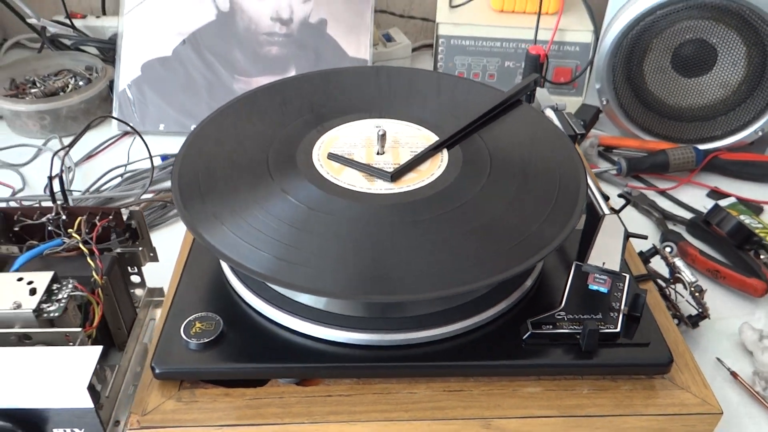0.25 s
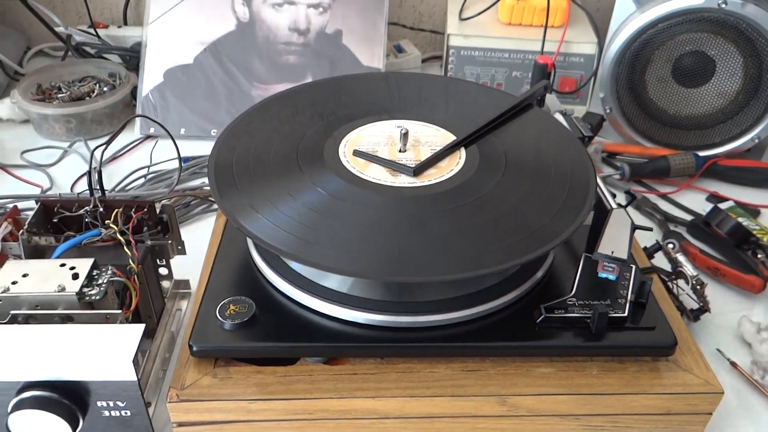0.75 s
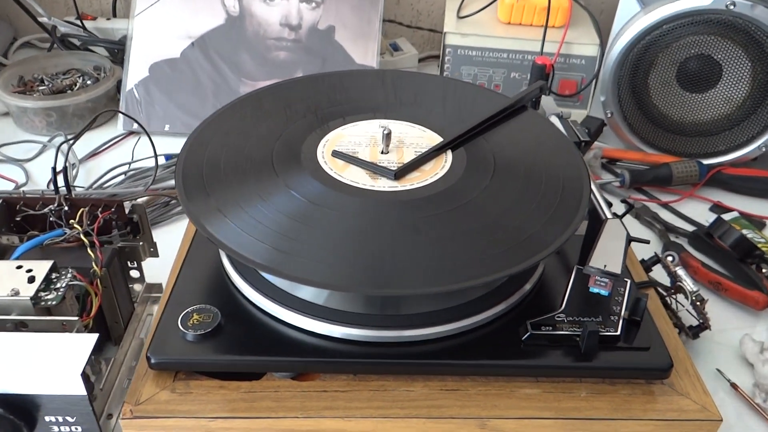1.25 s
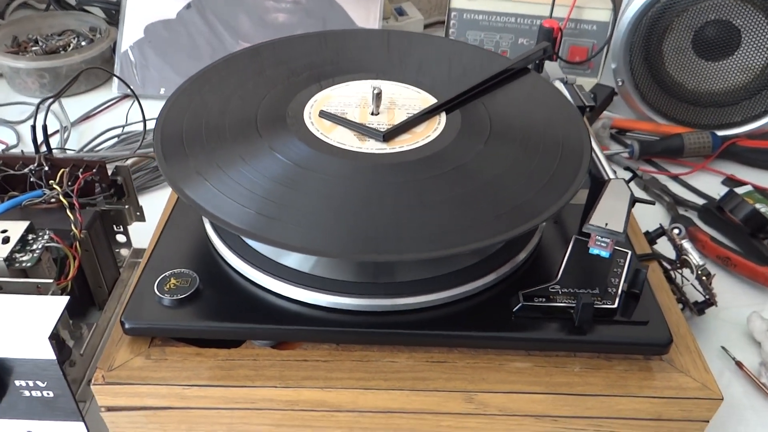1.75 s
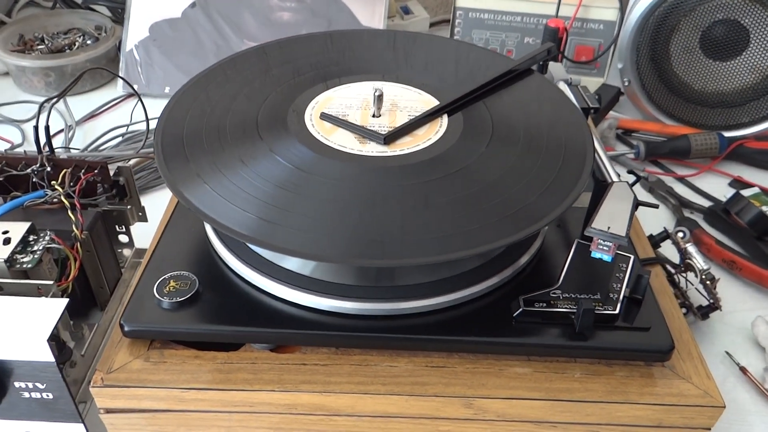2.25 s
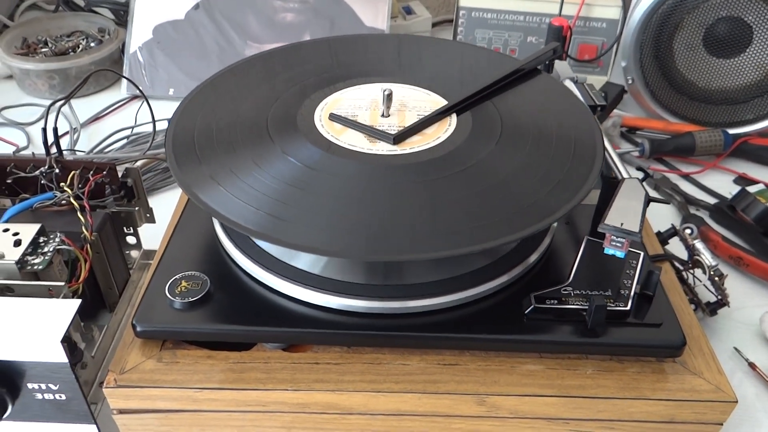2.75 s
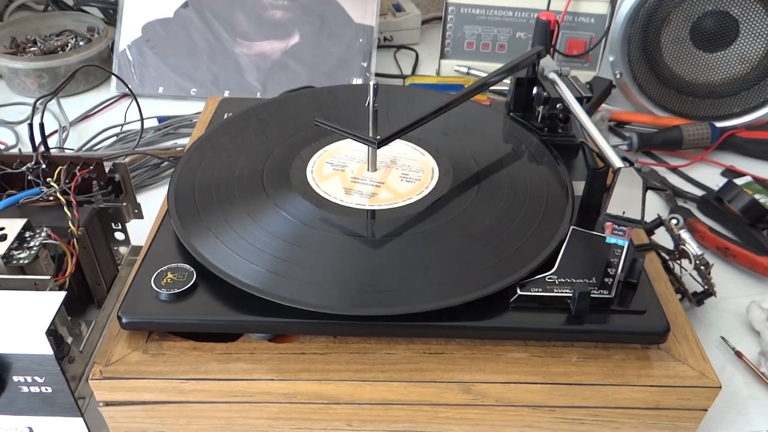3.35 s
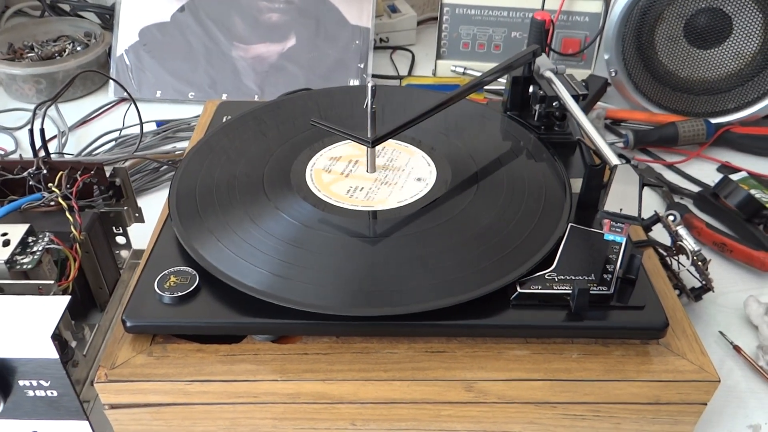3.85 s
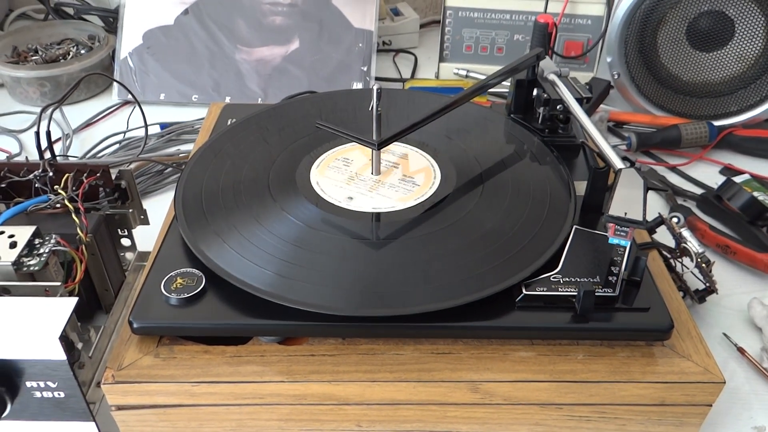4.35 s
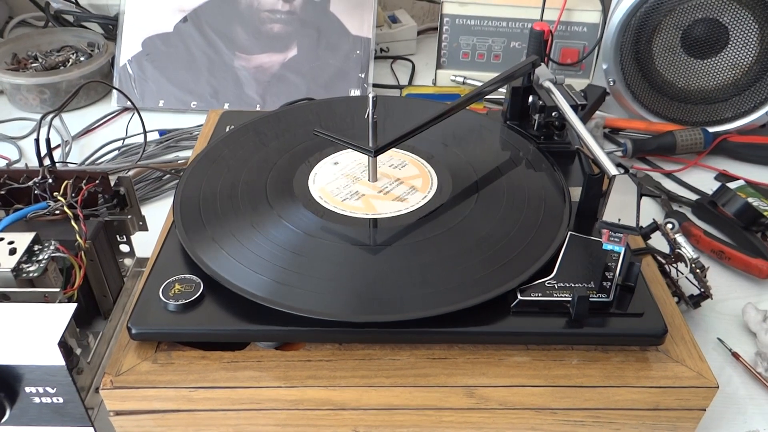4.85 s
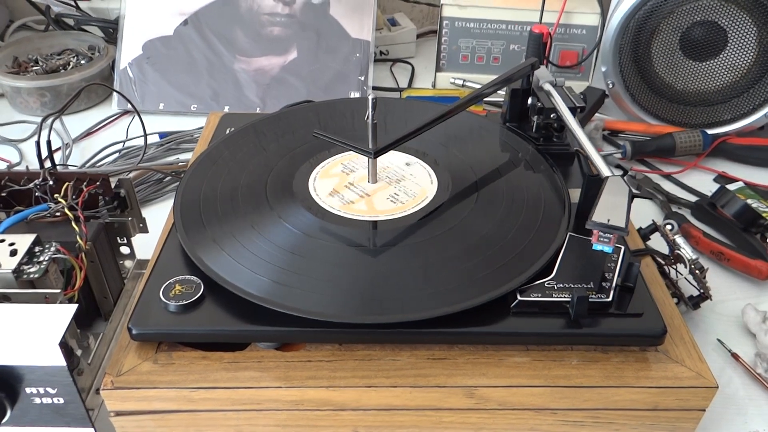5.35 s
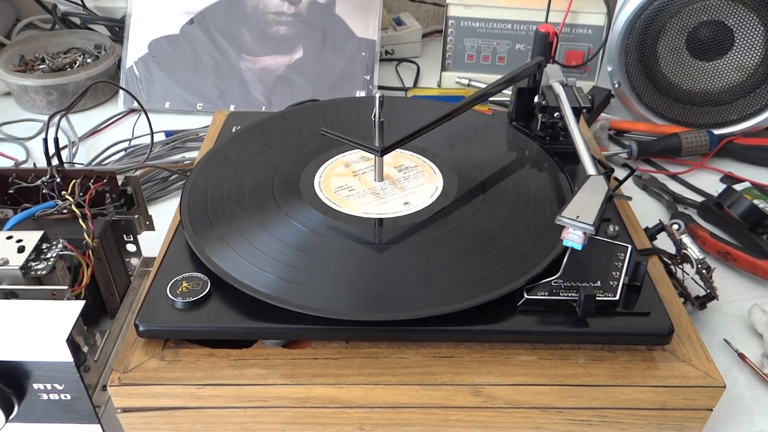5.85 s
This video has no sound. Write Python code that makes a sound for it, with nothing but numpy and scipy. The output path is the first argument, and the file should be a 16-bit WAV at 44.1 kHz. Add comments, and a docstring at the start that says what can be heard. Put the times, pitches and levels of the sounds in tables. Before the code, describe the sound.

A record changer clicks and pings, its disc rattles on the spindle, snaps loose and slaps the platter, then a linkage clacks over faint hum.

```python
"""A record changer's steel parts and disc strike one another through a cycle, on a workbench in a small room.
A pawl pings, levers click, the disc rattles on the spindle, snaps off its ledge and slaps onto the platter,
then the tone arm's linkage knocks: each blow is a click, a dense noise ring and decaying sine modes.
Jolts make the deck boom. Fainter are shaped noise for a fading tail, sliding steel and soft bumps,
a hum of sine lines that steps up as the motor is switched on, and coloured noise for room tone."""
import sys
import numpy as np
from scipy import signal
from scipy.fft import rfft, irfft, next_fast_len
from scipy.io import wavfile
from scipy.ndimage import map_coordinates

SR = 44100
rng = np.random.default_rng(int(sys.argv[2]) if len(sys.argv) > 2 else 0)


def dump_mix(stems):
    """Bounce the given channels to the path in sys.argv[1] as a 16-bit WAV at rate SR."""
    frames = np.atleast_2d(stems).T  # one column per channel
    limited = np.clip(frames, -1, 1)  # hard clip at full scale
    pcm = np.round(limited * 32767).astype(np.int16)
    wavfile.write(sys.argv[1], SR, pcm)


N = 269010  # samples in the scene
AGE = np.arange(SR * 3 // 4) / SR  # seconds since a blow


def amp(db):
    """Decibel law: the amplitude ratio of a level in dB."""
    return 10 ** (np.asarray(db) / 20)


def unit(x):
    """Mean power: scale to rms 1."""
    return x / np.sqrt(np.mean(x ** 2) + 1e-20)


def unit_energy(x):
    """Total energy: scale the sum of squares to 1."""
    return x / np.linalg.norm(x)


def fade(t, t60):
    """Exponential damping: the level falls 60 dB in t60 seconds."""
    return amp(-60 * t / np.maximum(t60, 1e-3))


def along(points, hz):
    """Logarithmic frequency scale: interpolate (Hz, value) points, held flat beyond the ends."""
    f, v = np.transpose(points)
    return np.interp(np.log(hz + 1), np.log(f + 1), v)


def filtered(x, response):
    """Linear filtering: multiply the spectrum by a complex response of frequency."""
    size = next_fast_len(x.shape[-1] + 4096, True)
    spectrum = rfft(x, size) * response(np.fft.rfftfreq(size, 1 / SR))
    return irfft(spectrum, size)[..., :x.shape[-1]]


def coloured(x, points):
    """Minimum phase: a causal filter with the gain of (Hz, dB) points, so that attacks stay sharp."""
    size = 4096
    cepstrum = irfft(np.log(amp(along(points, np.fft.rfftfreq(size, 1 / SR)))))
    # folding the cepstrum onto positive times makes the response causal
    cepstrum[1:size // 2] *= 2
    cepstrum[size // 2 + 1:] = 0
    impulse = irfft(np.exp(rfft(cepstrum)))
    return signal.fftconvolve(x, impulse)[:len(x)]


def add(track, s, sound):
    """Superposition: mix a sound into the track at time s."""
    part = track[..., round(s * SR):][..., :sound.shape[-1]]
    part += sound[..., :part.shape[-1]]


def noise(spectrum):
    """Stationary random sound: noise of rms 1 coloured by (Hz, dB) points."""
    white = rng.standard_normal(N)
    return unit(filtered(white, lambda hz: amp(along(spectrum, hz))))


def modal_ring(hz, strength, t60):
    """Modal superposition: damped sines of random starting phase."""
    phase = rng.random(hz.shape)
    return (strength * fade(AGE, t60) * np.sin(2 * np.pi * (hz * AGE + phase))).sum(0)


# Decay of the small room. Each row: frequency in Hz, 60 dB decay time in s.
ROOM_DECAY = [(150, 0.29), (600, 0.35), (2000, 0.36), (5000, .38), (9000, .3), (14000, 0.2)]


def reverberation(x, build_up=0.0036):
    """Diffuse decay: a fresh noise tail builds up in seconds, then dies soonest at the top of the treble."""
    hz, t, z = signal.stft(rng.standard_normal(len(AGE)), SR, nperseg=256)
    decaying = z * fade(t, along(ROOM_DECAY, hz)[:, None])
    tail = signal.istft(decaying, SR)[1][:len(AGE)]
    # build_up is a time constant in seconds
    response = unit_energy(tail * (1 - np.exp(-AGE / build_up)))
    return signal.fftconvolve(x, response)[:len(x)]


# Knock, middle band and crack of a blow. Each row: lower edge in Hz, upper edge in Hz.
BLOW_BANDS = [(150, 1000), (1000, 4500), (4500, 15000)]


def hardness(x, knock_db, crack_db):
    """Contact stiffness: gains that steer low knock and high crack against the middle; deep bass is weak."""
    power = np.abs(rfft(x)) ** 2 / len(x)
    hz = np.fft.rfftfreq(len(x), 1 / SR)
    have_db = np.array([10 * np.log10(power[(hz > lo) & (hz < hi)].sum()) for lo, hi in BLOW_BANDS])
    low, middle, high = np.array([knock_db, 0, crack_db]) - have_db
    return [(40, low - 30), (130, low), (850, low), (1200, middle), (2100, middle), (5200, high)]


def strikes(rows, body, modes, level_db, body_t60, modes_db, room_db, side_db=-8):
    """Impact excitation: each contact is a click, a short dense ring and clear modes, heard in the room."""
    mid, side = np.zeros((2, N))
    hz, mode_db, t60 = np.transpose(modes)[:, :, None]
    for s, db, knock_db, crack_db, click_db in rows:
        blow = unit_energy(rng.standard_normal(len(AGE)) * fade(AGE, body_t60))
        blow[0] += amp(click_db)
        dense = unit_energy(coloured(blow, body))
        # the point of contact varies, so the modes share the blow differently each time
        strength = amp(mode_db + rng.normal(0, 1.66, hz.shape))
        onset = 1 - np.exp(-AGE / 0.00052)
        ring = unit_energy(modal_ring(hz, strength, t60) * onset)
        heard = dense + amp(modes_db) * ring + amp(room_db) * reverberation(dense)
        shares = hardness(heard, knock_db, crack_db)
        add(mid, s, amp(db + level_db) * coloured(heard, shares))
        side_gain = amp(db + level_db + room_db + side_db)
        add(side, s, side_gain * coloured(reverberation(dense), shares))
    return np.array([mid, side])


def rebounding(throws, loss_db, knock_db, click_db):
    """Inelastic rebound: each throw hits its stop and strikes once more, weaker by loss_db."""
    rebound_s = .0098
    rows = []
    for s, db, crack_db in throws:
        for k in range(2):
            rows.append((s + k * rebound_s, db - k * loss_db, knock_db, crack_db, click_db))
    return rows


def rocking(s, heaviest_s, peak_db, fall_db_per_s):
    """Rocking of a rigid body: the disc's low knock falls away on both sides of its heaviest jolt."""
    return peak_db - fall_db_per_s * abs(s - heaviest_s)


def changer():
    """Superposition of impacts: all contacts of the cycle, as mid and side."""
    return pawl() + levers() + ticks() + arm() + rattle() + settle() + push() + landing()


# In every table of contacts the level is relative: the part's level_db is added to it.
# Pawl contacts. Each row: start in seconds, level in dB.
PAWL_CONTACTS = [(0.2695, -55), (0.2748, -39), (0.2773, -34)]
# Colour of the pawl's dense ring. Each row: frequency in Hz, gain in dB per Hz.
PAWL_COLOUR = [(120, -37), (290, -11.5), (500, -29), (735, -10), (950, -24), (1600, -5), (2400, -15.5),
               (3300, -6), (5000, -10), (7500, -8.5), (9200, 1.5), (10600, -2.5), (12300, -12),
               (15500, -25)]
# Clear modes of the pawl. Each row: frequency in Hz, relative strength in dB, 60 dB decay time in s.
PAWL_RESONANCES = [(290, -18, .22), (730, -6.5, 0.17), (752, -7, 0.16), (1485, -11, 0.22), (2905, -2, 0.22),
                   (3490, -7, .3), (4180, -4, 0.48), (4220, -5, 0.29), (5780, 2.5, 0.27), (8790, 0, 0.24),
                   (8910, 4, 0.42), (9340, -1, 0.33), (10200, -6, .2), (12270, -9, .15)]


def pawl(thud_db=-43, crack_db=8.5, click_db=-15, brighten=.72):
    """Nonlinear contact: the pawl touches, then snaps in; one dull thud, but brighter the harder it hits."""
    top_db = max(db for s, db in PAWL_CONTACTS)
    rows = [(s, db, thud_db - db, crack_db + brighten * (db - top_db), click_db)
            for s, db in PAWL_CONTACTS]
    return strikes(rows, PAWL_COLOUR, PAWL_RESONANCES,
                   level_db=14, body_t60=.08, modes_db=0, room_db=-6)


# Throws of the levers. Each row: start in seconds, level in dB, high crack over the middle band in dB.
LEVER_THROWS = [(0.3639, -25.5, -10.5), (0.6749, -32, -15), (0.7122, -38.5, -17), (2.3432, -18, -21.5),
                (4.2693, -33.5, -24.5)]
# Colour of the levers' dense ring. Each row: frequency in Hz, gain in dB per Hz.
LEVER_COLOUR = [(100, -36), (190, -25), (290, 1), (500, -31.5), (730, -2.5), (950, -9), (1250, 0.5),
                (1600, 2), (1850, 2.5), (2400, -1.5), (3300, -6), (4600, -19), (9000, -21.5), (15500, -45)]
# Clear modes of the levers, also rung by the ticks.
# Each row: frequency in Hz, relative strength in dB, 60 dB decay time in s.
LEVER_RESONANCES = [(283.5, -15, 0.35), (735, -15, 0.19), (1350, 6, 0.35), (1400, 1, 0.32), (1584, 3, 0.32),
                    (1770, 8, 0.15), (1880, 9.5, 0.29), (2030, -19, 0.24), (2330, -2, 0.43),
                    (2620, -18, 0.36), (2860, -2, 0.42), (3970, -7, 0.38)]


def levers():
    """Impact and rebound: the cam throws steel levers against their stops."""
    rows = rebounding(LEVER_THROWS, loss_db=4.5, knock_db=-9.5, click_db=-16.5)
    return strikes(rows, LEVER_COLOUR, LEVER_RESONANCES,
                   level_db=14.5, body_t60=0.052, modes_db=-7.0, room_db=-6)


# Light ticks. Each row: start in seconds, level in dB.
TICK_CONTACTS = [(0.149, -57.5), (1.1267, -51), (2.3059, -47.5), (3.4196, -45), (5.984, -53)]
# Colour of a tick's dense ring. Each row: frequency in Hz, gain in dB per Hz.
TICK_COLOUR = [(200, -29), (600, -12), (1000, 3), (2000, 7), (2900, -5.5), (4500, -38), (15000, -38)]


def ticks(thud_db=-53, crack_db=-22, click_db=-10):
    """Light impact: play in the levers gives brief ticks that ring the lever modes weakly."""
    rows = [(s, db, thud_db - db, crack_db, click_db) for s, db in TICK_CONTACTS]
    return strikes(rows, TICK_COLOUR, LEVER_RESONANCES,
                   level_db=15.0, body_t60=0.031, modes_db=-12, room_db=-5)


# Throw of the arm linkage. Each row: start in seconds, level in dB, high crack over the middle band in dB.
ARM_THROWS = [(3.9212, -17.5, -13.5)]
# Colour of the linkage's dense ring. Each row: frequency in Hz, gain in dB per Hz.
ARM_COLOUR = [(120, -43), (200, -28), (290, -2.5), (480, -39), (800, -8.5), (1100, -13.5), (1260, -2.5),
              (2000, -2.5), (2900, 1), (3950, 0.5), (4400, -15), (7200, -10.5), (9200, -17), (15500, -40.5)]
# Clear modes of the linkage. Each row: frequency in Hz, relative strength in dB, 60 dB decay time in s.
ARM_RESONANCES = [(286, 0, 0.16), (1274, 14, 0.21), (1246, 15, 0.24), (1510, -9.5, .3), (1820, 4, 0.27),
                  (2780, -11, 0.28), (3540, -5, .27), (3940, -1, .3), (4070, 5.5, 0.43), (4003, -2, 0.32),
                  (5530, -14, 0.28), (7160, -7, .26), (8900, -5, 0.24)]


def arm():
    """Impact and rebound: the linkage that swings the tone arm in strikes twice."""
    rows = rebounding(ARM_THROWS, loss_db=6, knock_db=-17.5, click_db=-27)
    return strikes(rows, ARM_COLOUR, ARM_RESONANCES,
                   level_db=15.0, body_t60=0.047, modes_db=-5.0, room_db=-4)


# Disc against spindle. Each row: start in seconds, level in dB, first click over the dense ring in dB.
RATTLE_CONTACTS = [(2.3433, -24, -5), (2.3541, -19.5, -18), (2.3656, -14, 1.5), (2.3728, -17, -15),
                   (2.397, -22.5, -6), (2.4061, -22, 4), (2.4142, -17.5, 7), (2.421, -20.5, -10)]
# Colour of the rattle's dense ring. Each row: frequency in Hz, gain in dB per Hz.
RATTLE_COLOUR = [(60, -65), (110, -26), (155, -16), (215, -37), (290, 1), (340, -24), (600, -18.5),
                 (720, 3.5), (860, -3.5), (1150, -13), (2000, -14), (3400, -20), (9400, -26), (15500, -53)]
# Clear modes of the rattle. Each row: frequency in Hz, relative strength in dB, 60 dB decay time in s.
SPINDLE_RESONANCES = [(294.4, -0.5, 0.34), (384, -13.5, 0.43), (477, -8, 0.32), (689, -21, 0.22),
                      (711.4, 5, 0.29), (766, -18, .15), (812, -10, 0.2), (846, -5, .2), (933, 0.5, .2),
                      (1187, -11, 0.23), (1594, -8, 0.14), (1900, 2.5, 0.05), (2070, -13, 0.15)]


def rattle(crack_db=-3):
    """Repeated impact: the jolted disc rocks and chatters against the spindle."""
    rows = []
    for s, db, click_db in RATTLE_CONTACTS:
        knock = rocking(s, heaviest_s=2.358, peak_db=-11.5, fall_db_per_s=124)
        rows.append((s, db, knock - db, crack_db, click_db))
    return strikes(rows, RATTLE_COLOUR, SPINDLE_RESONANCES,
                   level_db=8.5, body_t60=0.044, modes_db=-1.0, room_db=-7.5)


# Last rocking of the disc. Each row: start in seconds, level in dB.
SETTLE_CONTACTS = [(2.486, -38), (2.4944, -39), (2.5594, -54)]
# Colour of its dense ring. Each row: frequency in Hz, gain in dB per Hz.
SETTLE_COLOUR = [(200, -42), (550, -30), (720, 0), (850, -3), (1150, -17), (1950, -11), (3000, -17),
                 (9000, -28), (15500, -48)]
# Its clear modes. Each row: frequency in Hz, relative strength in dB, 60 dB decay time in s.
SETTLE_RESONANCES = [(708.6, 5, 0.13), (720, 0, .18), (815, -8, .2), (826, -5, 0.22)]


def settle(knock_db=13.5, crack_db=-17, click_db=-20):
    """Weak excitation: the last soft rocking of the disc is too light to shake the deck."""
    rows = [(s, db, knock_db, crack_db, click_db) for s, db in SETTLE_CONTACTS]
    return strikes(rows, SETTLE_COLOUR, SETTLE_RESONANCES,
                   level_db=11, body_t60=.04, modes_db=6, room_db=-11)


# Disc against ledge. Each row: start in seconds, level in dB.
PUSH_CONTACTS = [(3.109, -35), (3.1176, -22), (3.126, -20), (3.14, -26), (3.1514, -11.5), (3.156, -16.5),
                 (3.1684, -19)]
# Colour of the push's dense ring. Each row: frequency in Hz, gain in dB per Hz.
PUSH_COLOUR = [(60, -63), (110, -22), (158, -15), (215, -25.5), (340, -9.5), (500, -18.5), (720, -6.5),
               (845, -1), (1130, -17.5), (1900, -14.5), (3500, -21), (7500, -19.5), (15500, -40)]
# Clear modes of the push. Each row: frequency in Hz, relative strength in dB, 60 dB decay time in s.
LEDGE_RESONANCES = [(145, -4.5, 0.072), (341, 1, 0.056), (378, -6, 0.3), (636, -9, 0.35), (704, -6, 0.12),
                    (833, 4, 0.38), (980, 1, 0.27), (1550, -10, 0.22), (2000, -10.5, .2),
                    (4840, -10.5, 0.37)]


def push(crack_db=-4.5, click_db=-2, sharpen=2.0, touch_db=-31):
    """Nonlinear contact: the disc scrapes along its ledge and snaps off; harder contacts click more."""
    snap_s, snap_db = max(PUSH_CONTACTS, key=lambda row: row[1])
    rows = []
    for s, db in PUSH_CONTACTS:
        knock = rocking(s, snap_s, peak_db=-12.5, fall_db_per_s=399.5)
        crack = crack_db + 2 * min(db - touch_db, 0)  # a mere touch has less crack
        click = click_db + sharpen * (db - snap_db)
        rows.append((s, db, knock - db, crack, click))
    return strikes(rows, PUSH_COLOUR, LEDGE_RESONANCES,
                   level_db=12.5, body_t60=.07, modes_db=-9.5, room_db=-5)


# Disc against platter. Each row: start in seconds, level in dB.
LANDING_CONTACTS = [(3.2138, -10), (3.2222, -11), (3.2262, -9.5), (3.2428, -14.5)]
# Colour of the landing's dense ring. Each row: frequency in Hz, gain in dB per Hz.
LANDING_COLOUR = [(70, -52.5), (130, -31), (280, -19.5), (430, -22), (600, 0.5), (760, -9.5), (900, -4.5),
                  (1300, -8.5), (1650, -4.5), (1880, 1), (2150, -4), (3000, -10), (6500, -19.5),
                  (9200, -14.5), (15500, -44.5)]
# Clear modes of the landing. Each row: frequency in Hz, relative strength in dB, 60 dB decay time in s.
DISC_RESONANCES = [(594, -2, 0.2), (604, -3, 0.21), (784, -6.5, .25), (830, -11, .25), (966, -2, 0.28),
                   (1287, -7, 0.36), (1520, -6, .25), (1820, 2, .22), (1867, 6, 0.25), (1960, 1.5, 0.3),
                   (2060, -5, 0.22), (2157, -7, 0.3), (2331, 1, .3)]


def landing(crack_db=-8.5, click_db=-9):
    """Impact of a plate: the disc's weight slaps onto the platter first, then the rim clatters."""
    rows = []
    for s, db in LANDING_CONTACTS:
        knock = rocking(s, heaviest_s=3.217, peak_db=-13, fall_db_per_s=601)
        rows.append((s, db, knock - db, crack_db, click_db))
    return strikes(rows, LANDING_COLOUR, DISC_RESONANCES,
                   level_db=12, body_t60=0.064, modes_db=-8.5, room_db=-6.0)


# Jolts that shake the whole deck. Each row: start in seconds, level in dB, to which the mode's is added.
DECK_JOLTS = [(2.378, -31), (3.158, -33)]
# Modes of the deck. Each row: frequency in Hz, relative strength in dB, 60 dB decay time in s.
DECK_RESONANCES = [(155, -10.5, .15), (294, -0.5, .24)]


def deck(rise_s=.009):
    """Resonance of a sprung mass: heavy jolts set the deck booming after a moment's build-up."""
    boom = np.zeros(N)
    hz, mode_db, t60 = np.transpose(DECK_RESONANCES)[:, :, None]
    for s, db in DECK_JOLTS:
        ring = modal_ring(hz, amp(mode_db), t60)
        add(boom, s, amp(db) * ring * (1 - np.exp(-AGE / rise_s)))
    return boom


# Tail and swells of hiss. Each row: peak in seconds, half length in s (to 1/e of the peak), peak level in dB.
HISS_SWELLS = [(0, .06, -67), (0.575, 0.077, -61.5), (0.922, 0.24, -70)]
# Colour of the hiss. Each row: frequency in Hz, gain in dB per Hz.
HISS_COLOUR = [(600, -30), (2000, 5), (6000, 0.5), (9500, -2), (13000, -30), (16000, -22.5)]


def slide():
    """Shaped noise: a fading tail of hiss at the start, then two swells of steel sliding on steel."""
    t = np.arange(N) / SR
    level = sum(amp(db) * np.exp(-((t - s) / half) ** 2) for s, half, db in HISS_SWELLS)
    return level * noise(HISS_COLOUR)


# Soft low bumps. Each row: start in seconds, level in dB before the rise and decay.
SOFT_BUMPS = [(.63, -54.5), (0.844, -53), (.94, -58), (1.01, -52)]
# Colour of the bumps. Each row: frequency in Hz, gain in dB per Hz.
BUMP_COLOUR = [(25, -27), (55, -17), (100, 2.5), (140, 7), (200, -17), (400, -15), (1200, -53)]


def bumps(t60=0.21):
    """Damped transient: each bump is a dull push of low noise that dies quickly."""
    level = np.zeros(N)
    for s, db in SOFT_BUMPS:
        add(level, s, amp(db) * fade(AGE, t60) * (1 - np.exp(-AGE / 0.0043)))
    return level * noise(BUMP_COLOUR)


# Weaker lines of the hum. Each row: frequency in Hz, mean level in dB, before the wavering.
HUM_LINES = [(150, -78.5), (200, -80.5), (298, -76), (560, -86), (598, -87.5), (899, -83)]


def motor(waver_db=1.5):
    """Magnetic hum at twice the mains frequency, with wavering lines, steps up as the motor is switched on."""
    switch_on_s, rise_s = .59, .04
    before_db, running_db = -73, -67
    t = np.arange(N) / SR
    strength = amp(np.interp(t, [switch_on_s, switch_on_s + rise_s], [before_db, running_db]))
    hum = strength * unit(np.sin(2 * np.pi * 100 * t))
    for hz, db in HUM_LINES:
        # slow random curves, four points a second, move each line's level and phase
        swell, drift = [map_coordinates(rng.standard_normal(64), [t * 4]) for _ in range(2)]
        line = unit(np.sin(2 * np.pi * hz * t + 0.79 * drift))
        hum = hum + unit(strength) * amp(db + waver_db * swell) * line
    return hum


# Colour of the room tone. Each row: frequency in Hz, gain in dB per Hz.
AIR_COLOUR = [(25, -30.5), (45, -21.5), (65, -17), (110, -6.5), (150, -15.5), (230, -12.5), (310, -11.5),
              (500, -12), (850, -12.5), (1300, -16.5), (2100, -21), (4500, -26), (9500, -26.5),
              (15800, -37)]


def room_tone(level_db=-65.5):
    """Stationary background: the room's steady coloured noise, drawn afresh at each call."""
    return amp(level_db) * noise(AIR_COLOUR)


# Phase between the ports. Each row: frequency in Hz, lead of the left port in radians.
PORT_LEAD = [(0, 0), (520, -0.61), (950, -0.8), (5340, -0.36), (16400, -0.22)]
# Width of diffuse sound. Each row: frequency in Hz, side gain in dB.
DIFFUSE_WIDTH = [(60, -19), (130, -8), (290, -5.5), (640, -2.5), (1410, -1.5), (3100, -4), (6820, -8.5),
                 (15000, -17.5)]


def scene():
    """Interchannel phase and coherence: two close microphone ports, between which diffuse sound differs."""
    mid, side = changer()
    direct = mid + deck() + slide()
    # each port takes half of the phase lead, with opposite signs
    near = filtered(direct, lambda hz: np.exp(.5j * np.outer([1, -1], along(PORT_LEAD, hz))))
    diffuse = filtered(side + room_tone(), lambda hz: amp(along(DIFFUSE_WIDTH, hz)))
    return near + room_tone() + motor() + bumps() + np.outer([1, -1], diffuse)


def record(dry, top_hz=15950):
    """Band limiting: nothing at or above top_hz passes."""
    return filtered(dry, lambda hz: hz < top_hz)


dry = scene()
out = record(dry)
dump_mix(out)
```